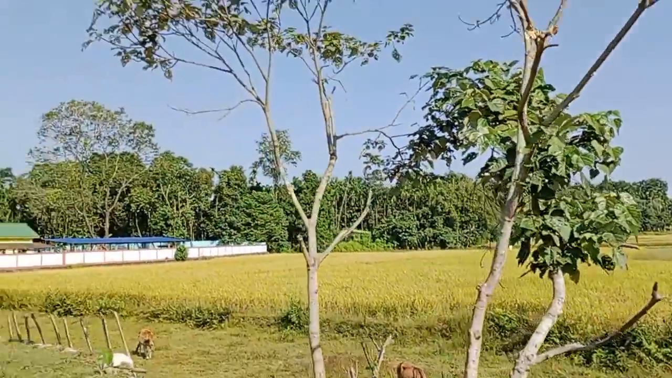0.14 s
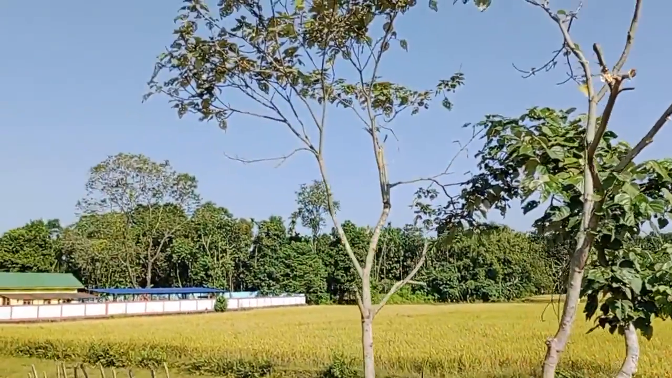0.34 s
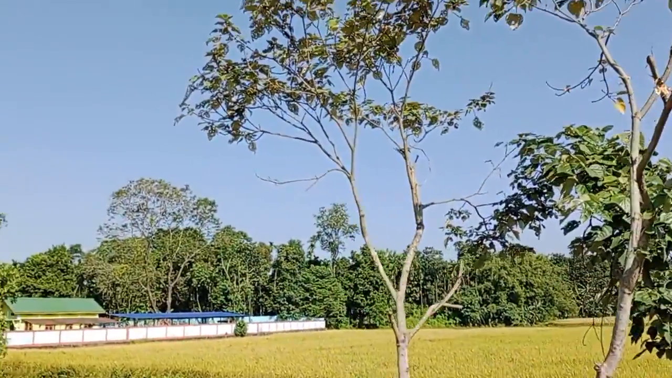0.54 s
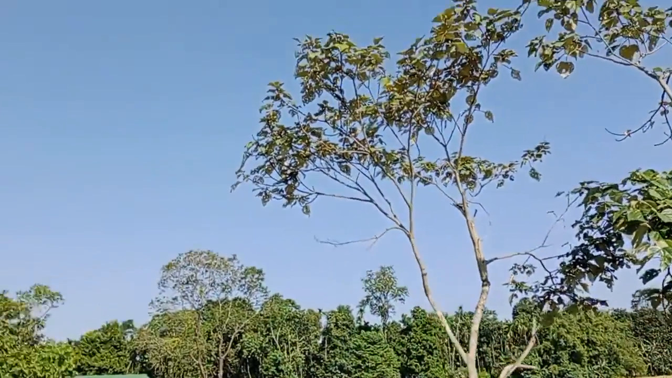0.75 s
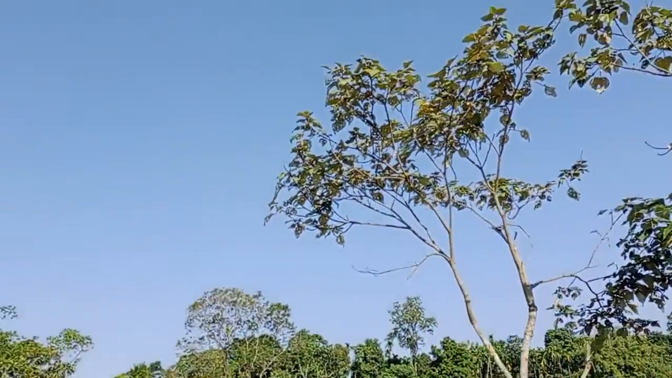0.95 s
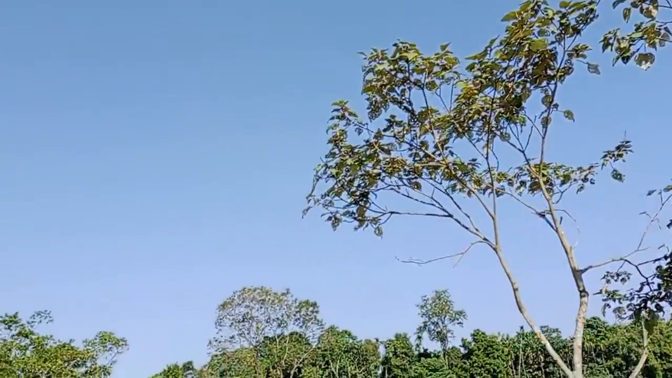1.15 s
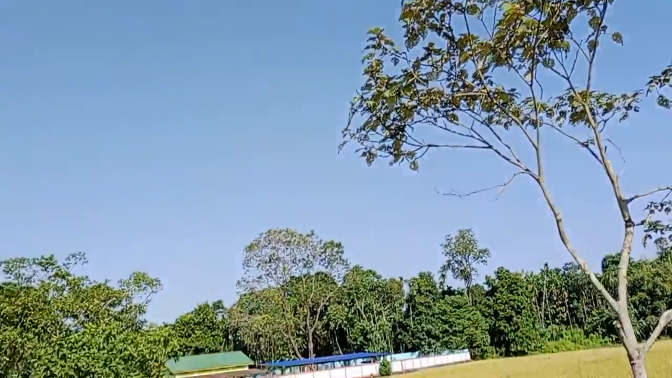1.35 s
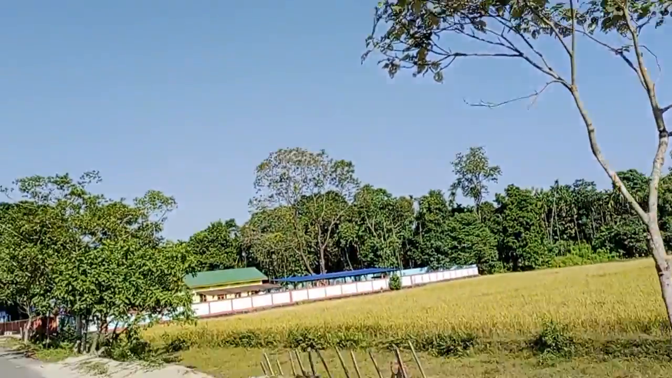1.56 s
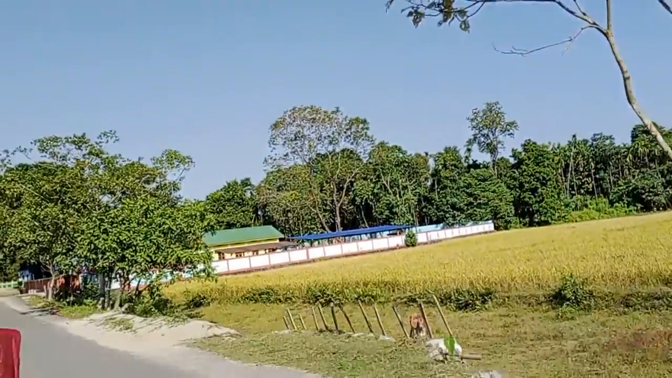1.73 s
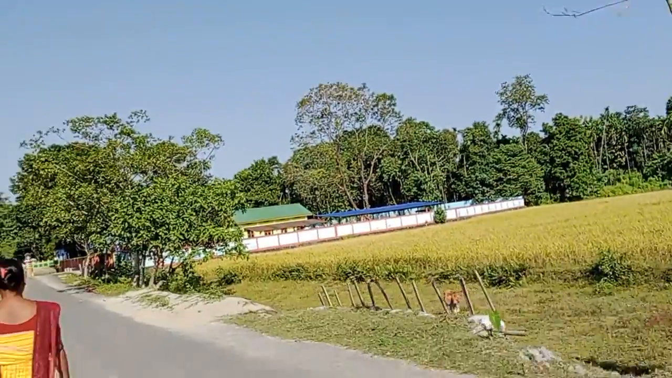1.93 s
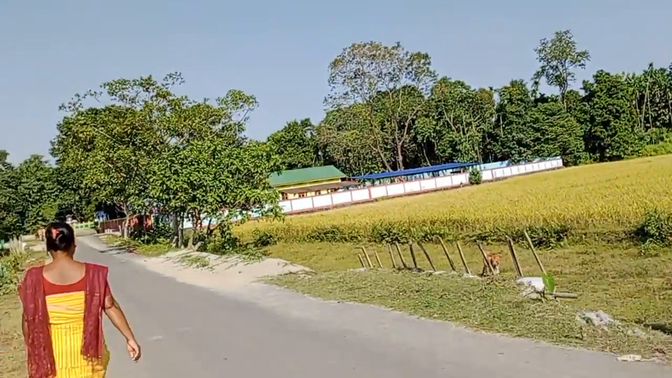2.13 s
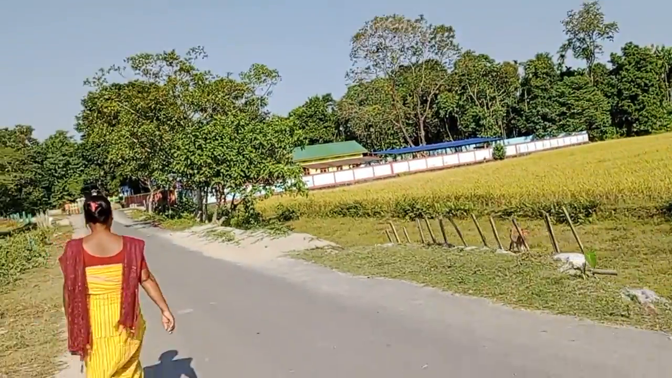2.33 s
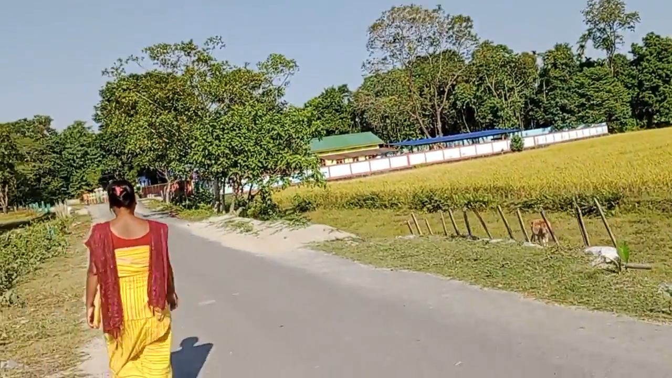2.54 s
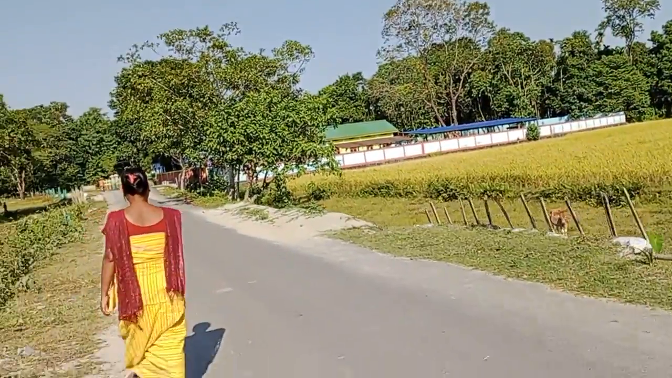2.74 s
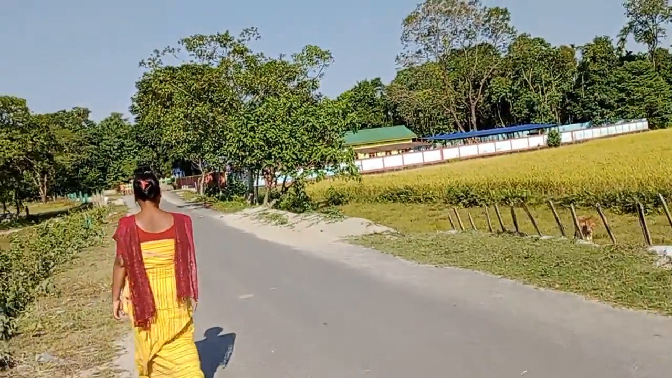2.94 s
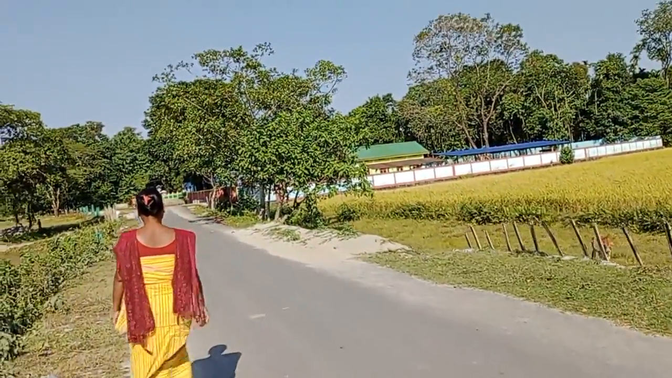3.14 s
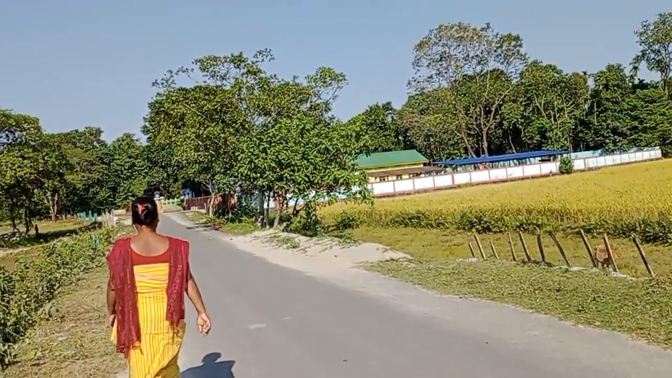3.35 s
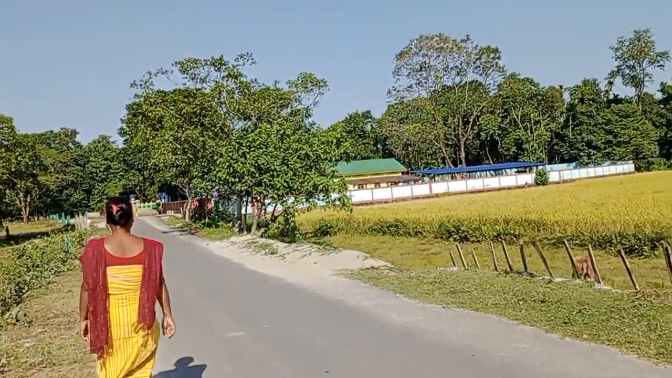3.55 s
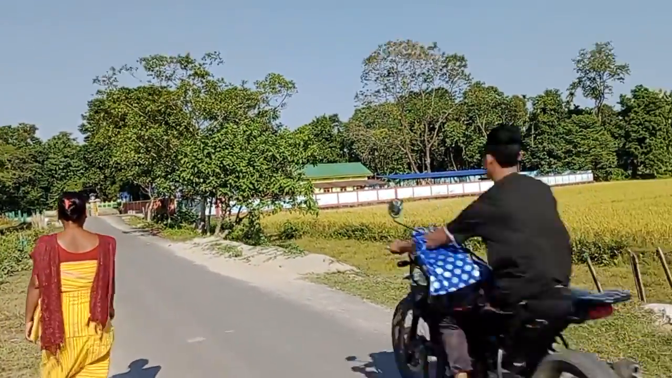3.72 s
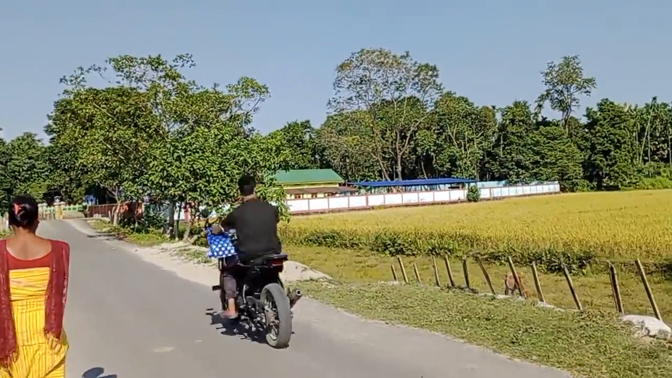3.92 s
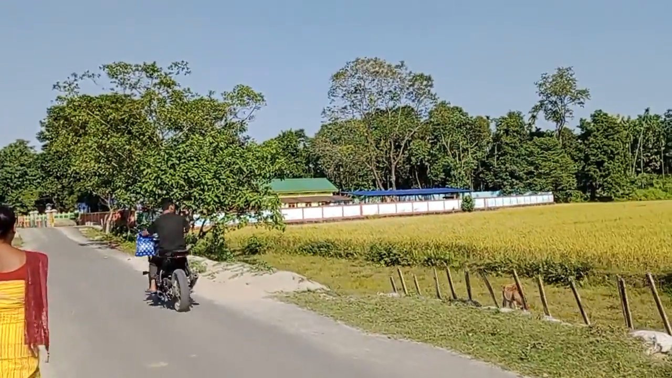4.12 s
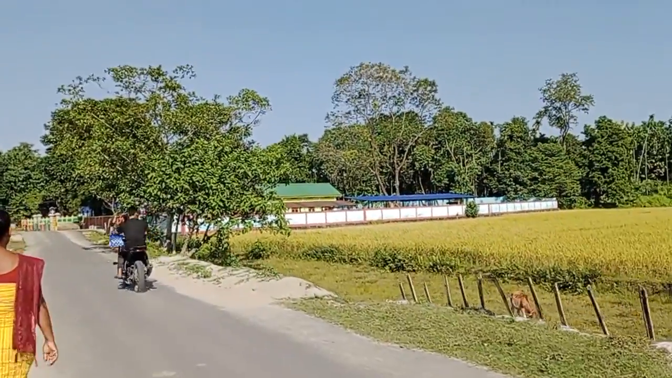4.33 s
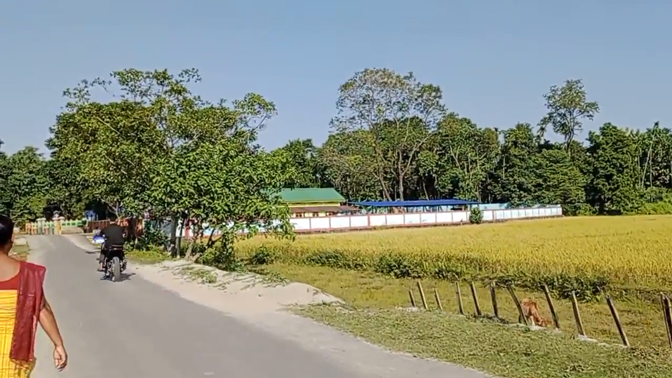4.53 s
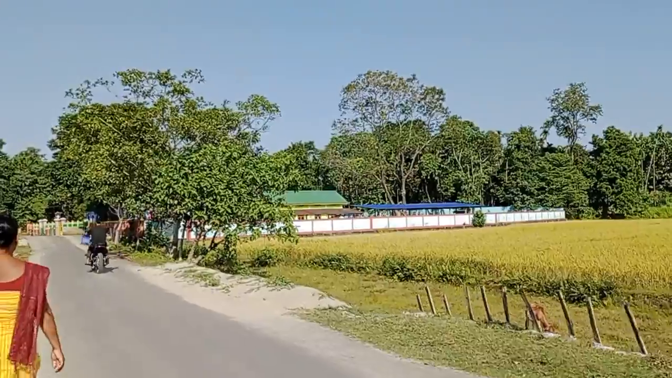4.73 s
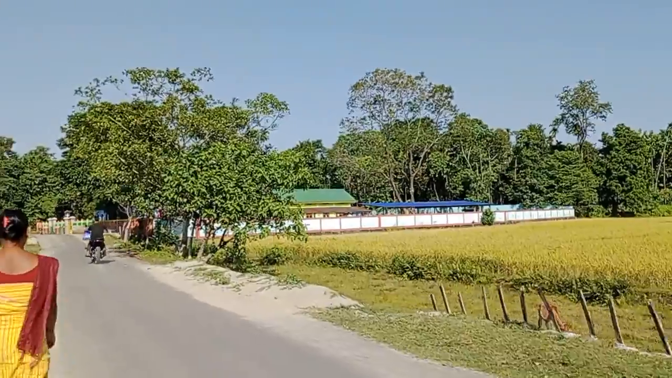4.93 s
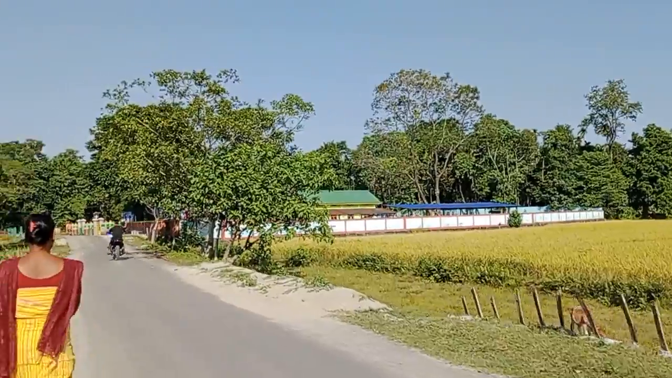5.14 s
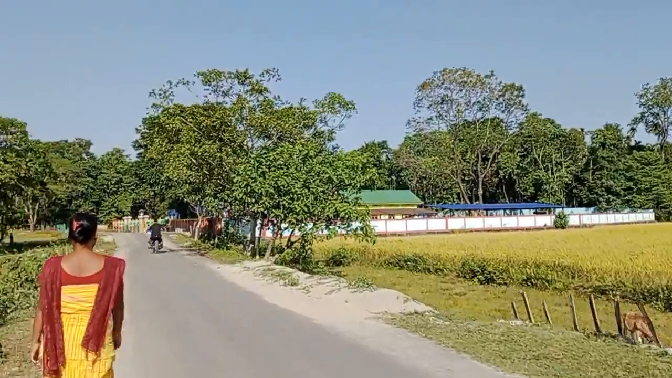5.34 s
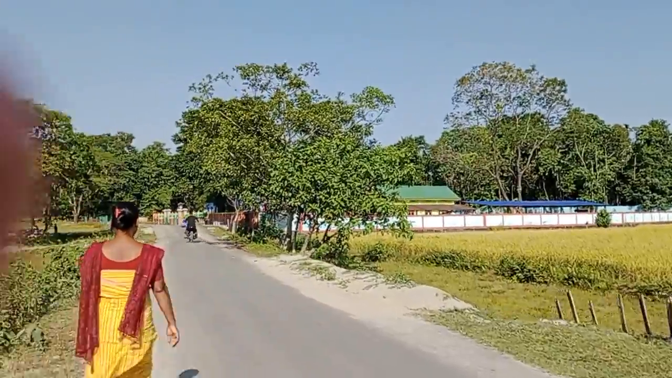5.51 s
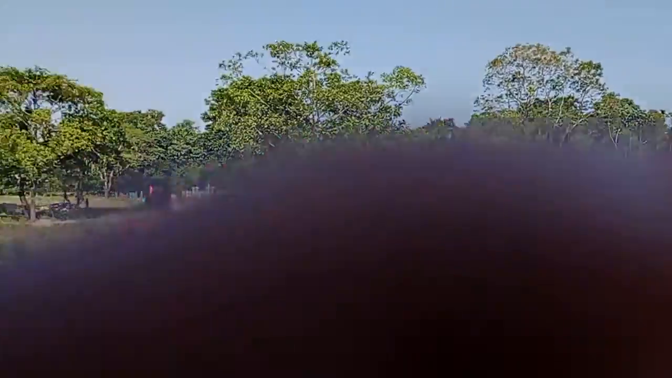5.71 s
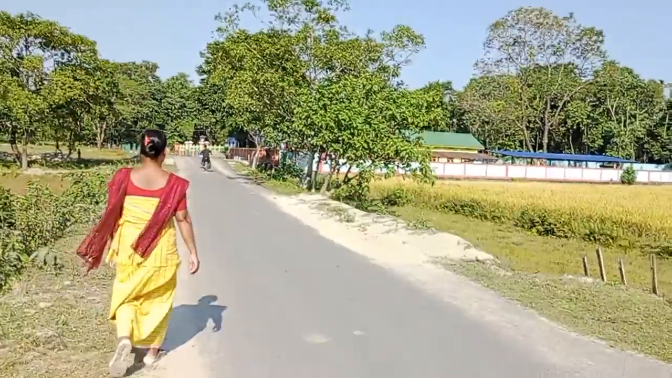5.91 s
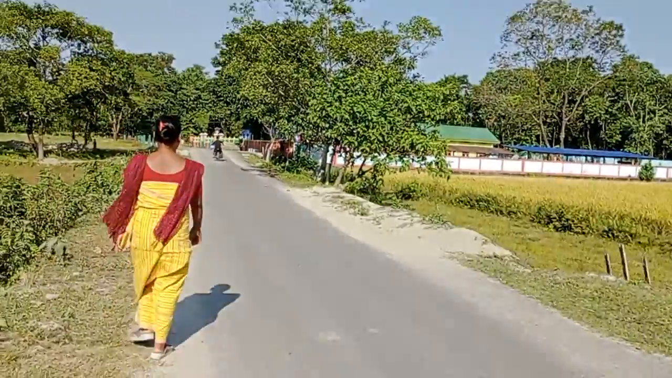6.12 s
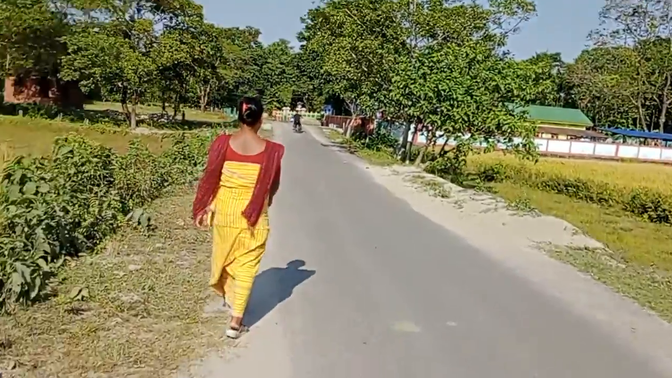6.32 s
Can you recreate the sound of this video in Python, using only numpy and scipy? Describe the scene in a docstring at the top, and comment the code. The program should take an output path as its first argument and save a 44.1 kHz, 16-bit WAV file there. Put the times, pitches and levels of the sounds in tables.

```python
"""A small one-cylinder motorcycle comes up a country road from behind, passes close by and rides away.
Firing pulses ring silencer and air-box modes; crank-locked partials, hums and puffing noise add the machinery.
Sandals scuff on the grit: noise grains, short ticks, a heel knock. Slipstream and light wind buffet the two
microphone ports of a hand-held phone: low noise and whirring tones. At the end a hand slides over it and taps."""
import sys
import numpy as np
from scipy import signal
from scipy.fft import rfft, irfft, next_fast_len
from scipy.io import wavfile
from scipy.ndimage import uniform_filter1d

SR = 44100
rng = np.random.default_rng(int(sys.argv[2]) if len(sys.argv) > 2 else 0)


def int16_out(signal):
    """Quantize to a 16-bit WAV file."""
    q = np.round(np.clip(np.atleast_2d(signal).T, -1, 1) * 32767)
    wavfile.write(sys.argv[1], SR, q.astype(np.int16))


N = 285368

# base loudness as the bike nears, passes, leaves: (time [s], exhaust beat [dB], mechanical hiss [dB])
BIKE_LEVEL = [(0, -50.5, -50.5), (.4, -48.5, -49.5), (.63, -46, -43.5), (1.3, -43, -43.5), (2.05, -38, -40),
              (2.72, -33.5, -36), (3.05, -31, -35), (3.41, -24, -17), (3.58, -26.5, -11.5),
              (3.68, -26, -12.5), (3.74, -30, -19.5), (3.85, -34, -27), (4.25, -31, -27), (4.45, -30, -24),
              (4.75, -35, -28.5), (5.35, -40.5, -29), (5.66, -48, -34), (5.89, -52.5, -45),
              (6.47, -61, -50.5)]
# bearing: (time [s], colour [0 far behind, 1 close behind, 2 alongside, 3 ahead, 4 far ahead,
# 5 hand over the phone], lead of the left port [ms])
BEARING = [(0, 0, .26), (2.6, .15, .28), (3.05, .5, .36), (3.28, 1, .43), (3.4, 1.3, .43), (3.6, 2, .36),
           (3.7, 2, .2), (3.85, 3, -.15), (4.1, 3, -.165), (4.3, 3, -.185), (4.5, 3, -.185), (4.8, 4, -.18),
           (5.6, 4, -.18), (5.85, 5, -.05), (6.47, 5, 0)]


def gain_of(db):
    """Decibels to an amplitude factor."""
    return 10 ** (np.asarray(db) / 20)


def evened(x):
    """Scales to rms 1."""
    return x / np.sqrt(np.mean(x ** 2) + 1e-20)


def smoothed(x, first, second, axis=-1):
    """Two moving averages in a row, lengths in samples."""
    return uniform_filter1d(uniform_filter1d(x, size=first, axis=axis), size=second, axis=axis)


def curves(rows, t):
    """Every column of a table, interpolated over its first at t."""
    s, *columns = np.transpose(rows)
    return [np.interp(t, s, c) for c in columns]


def colours(rows, hz):
    """Every column of a spectrum, interpolated on a log-frequency axis."""
    f, *columns = np.transpose(rows)
    return np.array([np.interp(np.log(hz + 1), np.log(f + 1), c) for c in columns])


def add(mix, s, sound, pan_db=0):
    """Mixes a sound in at s seconds; positive pan_db attenuates the right port, negative the left."""
    part = mix[:, round(s * SR):][:, :len(sound)]
    part += sound[:part.shape[1]] * gain_of([[min(pan_db, 0)], [min(-pan_db, 0)]])


def band(x, lo_hz, hi_hz, order=2):
    """Butterworth band-pass."""
    return signal.sosfilt(signal.butter(order, [lo_hz, min(hi_hz, SR / 2.2)], "band", fs=SR, output="sos"), x)


def spell(t, start, end, rise_s, fall_s):
    """Climbs from 0 to 1 after start, sinks back after end."""
    return np.clip(np.minimum((t - start) / rise_s, 1 - (t - end) / fall_s), 0, 1)


def crank():
    """Firings counted at every sample: the integral of the firing rate."""
    # crank speed as heard: (time [s], rate [firings/s])
    firing_rate = [(0.0, 32.98), (0.24, 28.31), (0.53, 30.48), (1.4, 30.54), (1.68, 27.33), (1.82, 33.53),
                   (1.94, 29.88), (2.25, 29.18), (2.5, 30.23), (2.77, 28.62), (2.97, 27.35), (3.05, 28.32),
                   (3.17, 31.37), (3.32, 30.08), (3.56, 29.1), (3.81, 27.6), (4.5, 28.47), (4.62, 26.18),
                   (5.16, 22.95)]
    first_turn = -.3  # firings
    return first_turn + np.cumsum(curves(firing_rate, np.arange(N) / SR)[0]) / SR


def opening(t):
    """Throttle, 0 shut to 1 open: the rider eases off in ramps."""
    # throttle lifts: (starts closing [s], starts opening [s], share closed [0-1])
    throttle_lifts = [(1.445, 1.684, 0.9), (2.72, 2.94, 0.9), (4.503, 7.0, 1)]
    close_s, open_s = 0.11, 0.14
    closed = sum(share * spell(t, start, end, close_s, open_s) for start, end, share in throttle_lifts)
    return np.clip(1 - closed, 0, 1)


def depth(t):
    """How deep the beat sounds, 0 outside the spells."""
    # spells of a deeper beat: (starts [s], starts fading [s], depth [factor])
    deep_spells = [(0.38, 1.328, 0.92), (3.28, 3.57, 1.23)]
    ramp_s = 0.13
    return sum(share * spell(t, start, end, ramp_s, ramp_s) for start, end, share in deep_spells)


def beat_gain(t):
    """Level of the exhaust beat: swells with the throttle shut and in deep spells."""
    shut_db, deep_db = 3.5, 2
    return gain_of(curves(BIKE_LEVEL, t)[0] + shut_db * (1 - opening(t)) + deep_db * depth(t))


def rung(at, size, modes):
    """Blows of given sizes at given seconds, each ringing decaying sine modes with a soft onset."""
    train, t = np.zeros(N + SR), np.arange(9000) / SR
    np.add.at(train, np.round(at * SR).astype(int), size)
    ring = -sum(gain_of(db - 60 * t / t60_s) * np.sin(2 * np.pi * hz * t) for hz, db, t60_s in modes)
    return signal.oaconvolve(train, ring * (1 - np.exp(-t / 0.002)))[:N]


def exhaust():
    """Each firing rings the silencer; a second beat follows, sooner and stronger when the throttle shuts."""
    # silencer modes, throttle open: (frequency [Hz], level [dB], t60 [s])
    silencer_open = [(83.3, -28, 0.0095), (138, 4.5, 0.031), (209, 7.5, 0.025), (283.6, -14.5, 0.061)]
    # silencer modes, throttle shut: (frequency [Hz], level [dB], t60 [s])
    silencer_shut = [(117, 3, 0.071), (167, 4.5, 0.045), (250, -1.5, 0.036)]
    # air box modes, heard from the front: (frequency [Hz], level [dB], t60 [s])
    air_box = [(242, -10.5, 0.074), (301, -6, 0.044), (335, -10, 0.079), (432, -13.5, 0.25)]
    fire_s = np.flatnonzero(np.diff(np.floor(crank()))) / SR - .0014
    throttle = opening(fire_s)
    colour, lead_ms = curves(BEARING, fire_s)
    first_draw, second_draw, gap_draw = rng.standard_normal((len(fire_s), 3)).T
    front = np.clip(1.6 - colour, 0, 1)
    plain_db = 4.8 * front * np.maximum(1 - depth(fire_s), 0)  # the second beat is clearer from the front
    first = gain_of(1.2 * first_draw)
    second = gain_of(4.5 - (13.0 - plain_db) * throttle + 3.4 * second_draw)
    gap_s = 0.0094 + 0.0042 * throttle + 0.0006 * gap_draw
    ports = []
    for at in (fire_s, fire_s + lead_ms / 1000):
        first_beat = rung(at, first * throttle, silencer_open) + rung(at, first * (1 - throttle), silencer_shut)
        second_beat = rung(at + gap_s, second, silencer_shut)
        ports.append(first_beat + second_beat + rung(at, first * front, air_box))
    return evened(np.array(ports)) * beat_gain(np.arange(N) / SR)


def orders():
    """Clean partials locked to the crank; each swells and sinks by itself."""
    # engine orders against the exhaust beat: (order, usual level [dB], level in a deep spell [dB])
    order_levels = [(3, -24.5, -8.5), (4, -29, -13.5), (5, -3.5, -13), (6, -9, -4.5), (2, -18, -11),
                    (7, -22, -17), (10, -18.5, -19.5), (8, -19, -19.5), (9, -19, -20.5), (11, -20.5, -18),
                    (13, -20.5, -19.5)]
    waver_db, shut_db = 2, -3.5  # orders fade with the throttle shut
    t = np.arange(N) / SR
    colour, lead_ms = curves(BEARING, t)
    turns = np.array([crank(), np.interp(t - lead_ms / 1000, t, crank())])
    tones = np.zeros((2, N))
    for order, usual_db, deep_db in order_levels:
        drift = np.interp(t, np.arange(50) * .14, rng.standard_normal(50))
        level_db = usual_db + (deep_db - usual_db) * depth(t) + waver_db * drift
        tones -= gain_of(level_db) * np.cos(2 * np.pi * round(order) * turns)
    tones *= gain_of(shut_db * (1 - opening(t))) * np.clip(4 - colour, 0, 1)  # lost once far ahead
    return np.sqrt(2) * tones * beat_gain(t)


def hums():
    """Thin gliding sines whose pitch and level waver a little."""
    # hums, some in whole-number stacks that drop as the bike passes:
    # (first frequency [Hz], last frequency [Hz], level against the beat [dB], start [s], end [s])
    hum_glides = [(338, 334, -6, 1.1, 2.05), (392, 410, -11, 0.01, 1.7), (388, 382, -9, 2.4, 2.85),
                  (819, 822, -13, 0.48, 1.45), (820, 800, -16, 1.5, 2.6), (330, 318, -7, 3.07, 3.6),
                  (672, 658, -12, 3.3, 3.47), (632, 612, -11, 3.43, 3.58), (985, 1002, -8, 3.22, 3.45),
                  (960, 920, -10, 3.4, 3.76)]
    flutter_db = 2
    t = np.arange(N) / SR
    lead_s = curves(BEARING, t)[1] / 1000
    tones = np.zeros((2, N))
    for first_hz, last_hz, db, start, end in hum_glides:
        hz = np.interp(t, [start, end], [first_hz, last_hz])
        waver = evened(smoothed(rng.standard_normal(N), 2500, 1500))
        cycles = np.cumsum(hz * (1 + .007 * waver)) / SR
        port_cycles = cycles - np.array([0 * t, hz * lead_s])
        level = gain_of(db + flutter_db * np.roll(waver, 9000)) * spell(t, start, end - .1, 0.041, 0.078)
        tones += level * np.sin(2 * np.pi * port_cycles)
    return np.sqrt(2) * tones * beat_gain(t)


def hiss(turning):
    """Patchy noise built in short spectral frames, coloured and delayed between the ports by bearing."""
    # hiss colours, relative levels: (frequency [Hz], left [dB], right [dB])
    far_behind = [(340, -65.5, -66), (600, -70.5, -70), (1020, -70, -71.5), (1430, -73.5, -78),
                  (2140, -71.5, -82), (3010, -85, -89), (4600, -87, -82), (6200, -87.5, -79),
                  (7800, -86, -96.5), (8820, -99.5, -104.0), (9660, -119.0, -118.0),
                  (15000, -130.0, -131.0)]
    close_behind = [(400, -55, -56), (695, -53, -53), (1070, -46, -50), (1480, -52.5, -54.5),
                    (2280, -47, -57), (3020, -55, -61.5), (4560, -59.5, -65), (6430, -66, -58.5),
                    (7730, -62, -78), (8800, -76.5, -78.5), (9900, -100, -87), (15000, -110.0, -109.0)]
    alongside = [(403, -83, -85), (710, -77, -77), (1100, -68, -67.5), (1490, -63.5, -63),
                 (2130, -55.5, -57.5), (3100, -64, -58.5), (4450, -57, -49.5), (6400, -61, -44),
                 (7670, -63, -62), (8850, -76, -70), (10200, -80, -92), (15100, -99.0, -102)]
    ahead = [(430, -71, -68.5), (645, -71, -71.5), (1230, -62, -62.5), (1580, -67, -71.5),
             (2200, -65, -66.5), (2930, -68.5, -68.5), (4600, -70, -60), (5900, -68.5, -58.5),
             (7900, -66.5, -81.5), (9100, -84.5, -86), (10100, -112, -102), (15000, -107.0, -103.0)]
    far_ahead = [(456, -79.5, -75.5), (670, -69, -70), (1130, -64.5, -63.5), (1440, -68, -68.5),
                 (1790, -61, -64.5), (2760, -66, -68), (4180, -69.5, -63), (6940, -73.5, -65.5),
                 (7550, -63, -93), (8750, -77, -81), (10500, -109, -99.5), (15000, -121.0, -108.0)]
    covered = [(480, -85, -81), (750, -76.5, -70.5), (1020, -75.5, -85), (1290, -85, -77),
               (1990, -76, -76.5), (3200, -80.5, -75), (4430, -83, -72.5), (6170, -83, -70.5),
               (7900, -77, -88), (9800, -102, -105.0), (10200, -115.0, -113.0), (15100, -130.0, -128.0)]
    # left-right likeness: (frequency [Hz], far behind [-1 to 1], from close behind on [-1 to 1])
    likeness = [(100, 1, .99), (1000, 0.88, .9), (1800, 0.94, 0.6), (2850, 0.12, .88), (3900, 0.11, 0.4),
                (6470, 0.25, 0.29), (12000, 0.4, 0.26)]
    frames, hz = N // 128 + 6, np.fft.rfftfreq(512, 1 / SR)
    t = np.arange(frames) * 128 / SR
    a, b, c, d, patches = rng.standard_normal((frames, len(hz), 5)).T
    patches = evened(smoothed(patches, 6, 1, axis=0))
    patches = evened(uniform_filter1d(patches, size=16, axis=1))
    clatter = rng.standard_normal(frames)  # all the treble flickers together
    colour, lead_ms = curves(BEARING, t)
    low_db, _, drone_db, drone_hz = curves(turning, colour)

    tables = (far_behind, close_behind, alongside, ahead, far_ahead, covered)
    shapes = np.array([colours(rows, hz) for rows in tables])
    index = np.arange(len(shapes))[:, None]
    share = np.clip(1 - abs(np.clip(colour, 0, len(shapes) - 1) - index), 0, 1)
    shape = gain_of(np.einsum("kcf,kt->cft", shapes, share))
    shape /= np.sqrt((shape[:, hz > 1500] ** 2).sum(1).mean(0) / len(hz))  # even power above 1500 Hz
    low = 1 / (1 + (hz[:, None] / 1100) ** 4)
    drone = drone_db / (1 + ((hz[:, None] - drone_hz) / 70) ** 2)
    flicker_db = (1.67 - 0.33 * low) * patches + 1.52 * (1 - low) * clatter
    level_db = curves(BIKE_LEVEL, t)[1] + low * low_db + drone + flicker_db

    far, near = colours(likeness, hz)[:, :, None]
    same = np.clip(far + (near - far) * np.clip(colour, 0, 1), -1, 1)
    phase = 2 * np.pi * hz[:, None] * lead_ms / 1000
    left = a + 1j * b
    right = (same * left + np.sqrt(1 - same ** 2) * (c + 1j * d)) * np.exp(-1j * phase)
    spectra = np.array([left, right]) * shape * gain_of(level_db)
    noise = signal.istft(spectra, nperseg=512, noverlap=384)[1][:, :N] / 16
    return band(noise, 310, 19000, order=3)


def machinery():
    """Chain, valves and tyres: the hiss, puffing in bands with each firing."""
    # what turns with the bearing: (colour, hiss below about 1 kHz [dB], chuff depth on the hiss [factor],
    # tyre drone [dB], tyre drone frequency [Hz])
    turning = [(0, -12.5, 0.089, -4, 820), (.05, -2, 0.15, 0.5, 760), (.15, 2.5, 0.094, -7, 882),
               (1.01, 1, 0.069, -6, 920), (2.01, 19, .7, 3, 760), (2.7, -4, 1.1, 11, 680),
               (3.0, -5.5, 2.27, 13.5, 633), (4.0, 6, 0.17, 11, 633), (5.0, 8, 0.083, 8.5, 880)]
    # puff bands, each by its own chance: (low edge [Hz], high edge [Hz], level [dB], unevenness [dB])
    puff_bands = [(350, 2500, -2, 3), (1610, 2900, 3, 2.5), (2520, 4300, -0.5, 11), (3880, 10100, 0.5, 2)]
    noise = hiss(turning)
    colour = curves(BEARING, np.arange(N) / SR)[0]
    chuff = np.maximum(curves(turning, colour)[1], 0)
    puff = np.exp(-((crank() + .04) % 1) / .13)
    firing = np.floor(crank() + 1.04).astype(int)
    draws = rng.standard_normal((250, len(puff_bands))).T[:, firing]
    out = noise.copy()
    for (lo_hz, hi_hz, db, uneven_db), draw in zip(puff_bands, draws):
        burst = smoothed(puff * gain_of(db + uneven_db * draw), 70, 40)
        out += burst * chuff * band(noise, lo_hz, hi_hz)
    return out


def scuffs():
    """Dragging sandals, then the sliding hand: dense uneven grains of band-passed noise."""
    # sandals on grit, then hand on phone:
    # (time [s], length [s], level before swell [dB], centre [Hz], left minus right [dB])
    scuff_events = [(0.011, 0.1, -44, 5300, 8), (0.476, 0.084, -43.5, 5760, 10),
                    (0.574, 0.02, -38, 4900, 7), (0.593, 0.039, -34.5, 4630, 6),
                    (0.729, 0.048, -27.5, 2040, 14), (1.127, 0.13, -46.5, 5150, 3.5),
                    (1.26, 0.04, -33, 4100, 17), (1.637, 0.02, -51, 6000, -1),
                    (1.7428, 0.016, -31, 4300, 6), (1.745, 0.042, -24, 2000, 19),
                    (1.765, 0.026, -16.5, 1780, 14), (1.783, 0.046, -19, 2250, 21),
                    (1.749, 0.11, -34, 5870, 1), (2.264, 0.13, -34.5, 5600, 6),
                    (2.297, 0.049, -36, 1770, 3), (2.77, 0.14, -20, 1930, 18), (2.754, 0.25, -36, 5900, 2),
                    (5.623, 0.1, -31, 3580, -22), (6.283, 0.14, -42.5, 2800, -2)]
    drag = 0.62  # swells early and trails off (1 = even)
    out = np.zeros((2, N))
    for s, length_s, db, hz, pan_db in scuff_events:
        n = round(length_s * SR)
        swell = np.sin(np.pi * np.linspace(0, 1, n) ** drag) ** 1.16
        grit, grains = rng.standard_normal((SR // 3, 2))[:n].T
        uneven = gain_of(3.6 * np.clip(evened(uniform_filter1d(grains, size=25)), -3, 2))
        add(out, s, gain_of(db) * evened(band(grit * uneven, hz * 0.48, hz * 1.26)) * swell, pan_db)
    return out


def ticks():
    """Grit and finger ticks: sine rings of a few cycles."""
    # ticks: (time [s], level before onset and decay [dB], frequency [Hz], left minus right [dB])
    tick_events = [(0.052, -39, 7090, 5), (0.4912, -28, 5040, -6), (0.5217, -28, 5060, -15),
                   (0.5327, -22, 4700, 5), (0.5801, -40, 5530, -7), (0.6, -22, 5330, -17),
                   (0.7767, -35, 1910, 4.0), (0.9812, -40, 2100, 13), (1.267, -16, 1780, 7),
                   (1.719, -26, 3970, -13), (1.7455, -18, 4300, -8), (1.7746, -16, 5560, -23),
                   (1.7765, -12, 1690, 1), (1.8055, -10, 1900, 3), (2.91, -19.5, 5630, -5),
                   (3.701, -9, 5800, -15), (3.7078, -7, 5750, -15), (5.618, -7, 1930, -24),
                   (6.031, -21, 2200, -11), (6.0984, -28, 3050, -2), (6.1633, -14.5, 1870, -24),
                   (6.218, -23, 1720, -13), (6.312, -29, 1500, -11), (6.3997, -35, 1130, -8)]
    out, t = np.zeros((2, N)), np.arange(1500) / SR
    onset, t60_s = 1 - np.exp(-t / 0.00015), 0.0035
    for s, db, hz, pan_db in tick_events:
        add(out, s, gain_of(db - 60 * t / t60_s) * onset * np.sin(2 * np.pi * hz * t), pan_db)
    return out


def knocks():
    """A heel on the road, then fingers knocking the case: decaying sines, mostly low."""
    # knocks: (time [s], level before decay [dB], frequency [Hz], t60 [s])
    knock_events = [(1.7725, -11.5, 330, 0.018), (6.326, -18, 222, 0.0061), (6.375, -18, 260, 0.0089),
                    (6.3991, -19, 3940, 0.0034), (6.4, -24, 1000, 0.013), (6.4009, -5.5, 294, 0.0056)]
    out, t = np.zeros((2, N)), np.arange(1500) / SR
    for s, db, hz, t60_s in knock_events:
        add(out, s, -gain_of(db - 60 * t / t60_s) * np.sin(2 * np.pi * hz * t))
    return out


def steps():
    """Scuffs, ticks and knocks, filtered by the colour of each port."""
    # port colour for sounds from the ground: (frequency [Hz], left [dB], right [dB])
    port_colour = [(800, -9, -3.5), (2180, -10.5, 0), (3680, -27, 1.5), (4480, -7, 2), (6470, -12.5, 13.5),
                   (7230, 6.5, -21), (8300, -1.5, -10), (10500, -27, -21), (15000, -45, -35)]
    size = next_fast_len(N + 2000)
    spectrum = rfft(scuffs() + ticks() + knocks(), size)
    return irfft(spectrum * gain_of(colours(port_colour, np.fft.rfftfreq(size, 1 / SR))), size)[:, :N]


def gusts():
    """Slipstream whirring mainly at one port: a wobbling sine glide plus noise around its pitch."""
    # gusts: (time [s], length [s], level before fades [dB], first frequency [Hz], last frequency [Hz],
    # left minus right [dB])
    gust_events = [(1.422, .15, -41, 99, 94, 20), (2.31, 0.043, -27, 160, 145, 17),
                   (4.29, 0.083, -25.5, 163.4, 151, 24), (4.42, 0.15, -24, 210, 190, 17),
                   (4.79, 0.053, -14, 154.4, 164, 47), (5.082, 0.024, -18, 148, 112, -35),
                   (5.213, 0.029, -20.5, 128, 129, -17), (5.245, 0.038, -18.5, 194, 132, -26),
                   (5.2, 0.14, -27.5, 156, 150, 22), (5.367, 0.041, -14.5, 241, 210, 38),
                   (5.401, 0.028, -12.5, 167, 99, 43), (5.489, 0.063, -24.5, 122, 116, 32),
                   (5.728, 0.018, -29, 200, 130, -9)]
    out = np.zeros((2, N))
    for s, length_s, db, first_hz, last_hz, pan_db in gust_events:
        n = round(length_s * SR)
        rumble, wobble = rng.standard_normal((2, SR // 2))
        wobble = evened(uniform_filter1d(wobble, size=400))[-n:]
        hz = np.linspace(first_hz, last_hz, n) * (1 + .12 * wobble)
        whirr = np.sin(2 * np.pi * np.cumsum(hz) / SR)
        swirl = whirr + 0.48 * evened(band(rumble, first_hz * 0.5, first_hz * 1.5)[-n:])
        add(out, s, gain_of(db) * evened(swirl) * signal.windows.tukey(n, .35), pan_db)
    return out


def breeze():
    """Light wind: lumpy low noise, unrelated at the two ports, that swells now and then."""
    # swells: (time [s], level at the top [dB], rise and fall [dB/s])
    swells = [(1.6, -50, 39), (2.6, -37.5, 22), (3.3, -27.5, 45), (4.402, -27, 86.5), (5.6, -37.5, 15.5),
              (6.15, -42.5, 24)]
    calm_db = -55
    t = np.arange(N) / SR
    swell_db = np.max([np.maximum(db - slope_db * abs(t - s), calm_db) for s, db, slope_db in swells], 0)
    noise, lumps = rng.standard_normal((2, 2, N))
    lumps = evened(smoothed(lumps, 1200, 900, axis=1))
    return evened(band(noise, 31, 238) * gain_of(4.7 * np.minimum(lumps, 1.6))) * gain_of(swell_db)


def scene():
    """Everything at the two ports."""
    return exhaust() + orders() + hums() + machinery() + steps() + gusts() + breeze()


def record(dry):
    """Gain control follows the louder port and ducks both; the preamp rounds the peaks; then the band limit."""
    threshold_db, duck_share, recovery_db_per_s, edge_hz = -20.5, 0.3, 61.0, 15600
    dry = signal.sosfilt(signal.butter(3, 62, "high", fs=SR, output="sos"), dry)  # microphone bass cut
    power = abs(uniform_filter1d(dry ** 2, size=500, axis=1)).max(0)
    power_db = 10 * np.log10(power + 1e-12)
    fall_db = np.arange(N) * recovery_db_per_s / SR
    held_db = np.maximum.accumulate(power_db + fall_db) - fall_db
    over_db = np.maximum(held_db - threshold_db, 0)
    ducked = dry / gain_of(duck_share * uniform_filter1d(over_db, size=300))
    rounded = 1.1 * np.tanh(ducked / 1.1)
    low_pass = signal.firwin(511, edge_hz, window=("kaiser", 9), fs=SR)
    return signal.oaconvolve(rounded, low_pass[None], "same")


dry = scene()
out = record(dry)
int16_out(out)
```